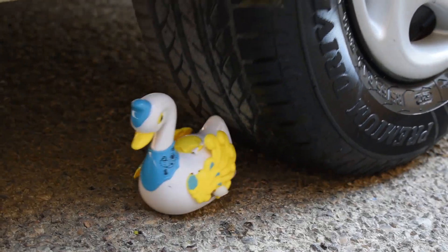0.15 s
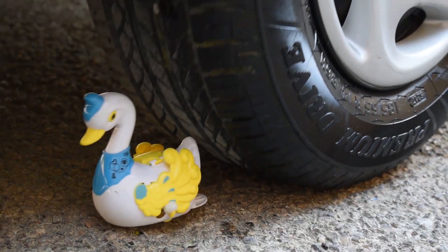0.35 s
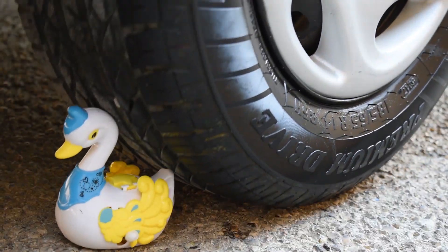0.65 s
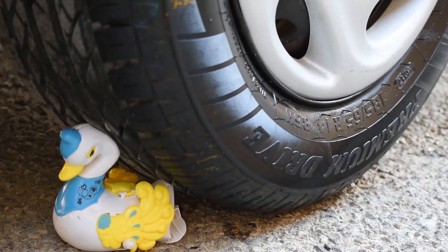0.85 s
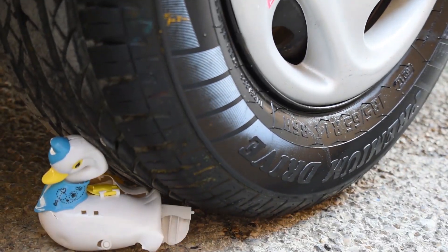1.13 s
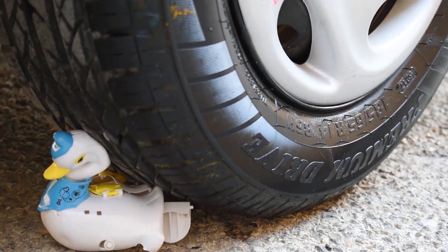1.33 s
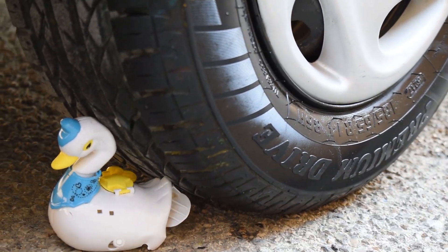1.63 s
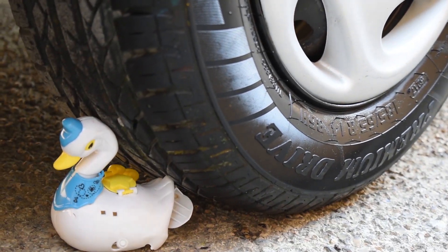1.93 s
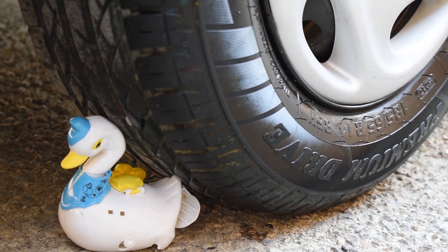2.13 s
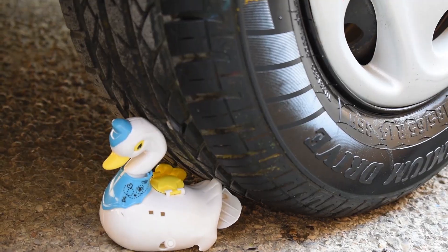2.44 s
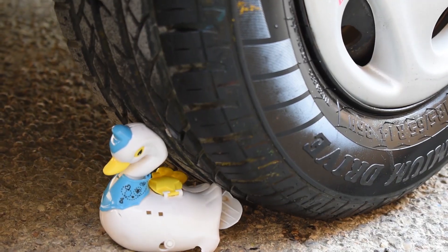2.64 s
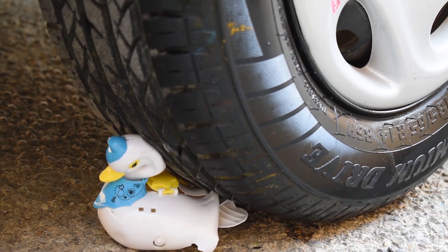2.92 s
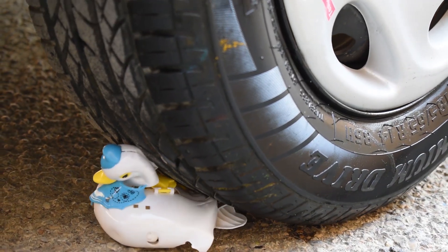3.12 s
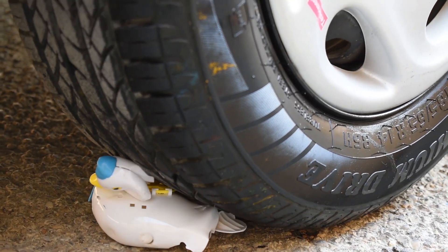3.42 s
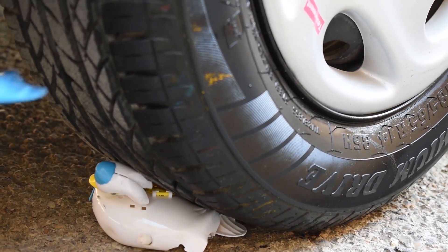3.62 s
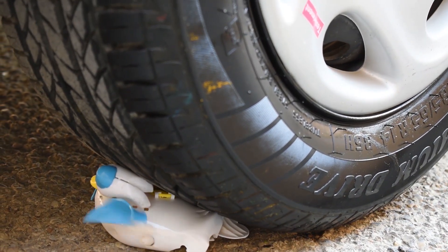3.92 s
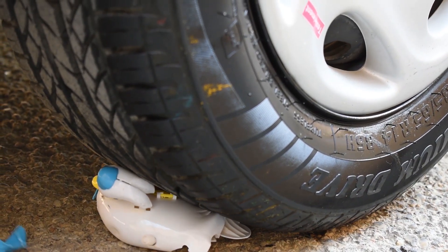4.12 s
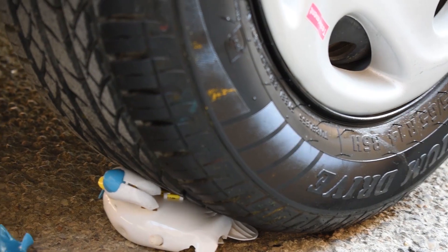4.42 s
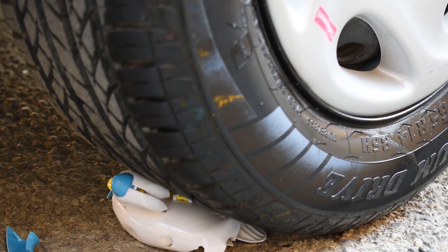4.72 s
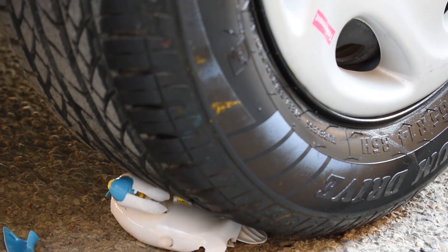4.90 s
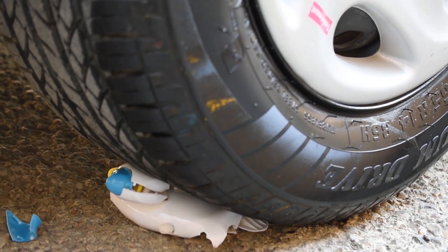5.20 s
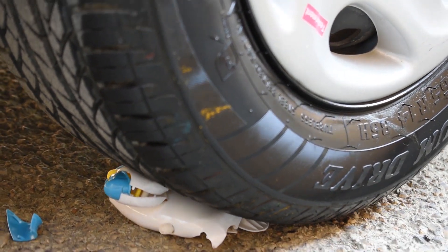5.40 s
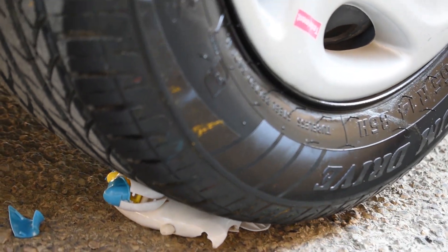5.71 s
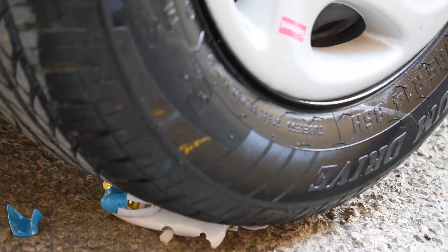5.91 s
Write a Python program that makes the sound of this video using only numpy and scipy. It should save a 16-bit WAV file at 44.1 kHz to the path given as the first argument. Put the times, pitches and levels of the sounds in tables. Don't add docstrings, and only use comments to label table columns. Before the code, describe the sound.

Hollow plastic scuffs and knocks on concrete, then cracks apart in dry, violent snaps under a creeping car tyre, over steady engine roar and whine.

```python
import sys
import numpy as np
from scipy import signal
from scipy.fft import rfft, irfft, next_fast_len
from scipy.io import wavfile
from scipy.ndimage import map_coordinates

SR = 44100
rng = np.random.default_rng(int(sys.argv[2]) if len(sys.argv) > 2 else 0)


def attenuation_scalar(level_db):
    decades = np.asarray(level_db, float) / 20
    return 10 ** decades


def waveform_to_disk(signal):
    frames = np.transpose(np.atleast_2d(signal))
    scaled = np.clip(frames, -1, 1) * 32767
    samples = np.round(scaled).astype(np.int16)
    wavfile.write(sys.argv[1], SR, samples)


N = 266893
TIME_S = np.arange(N) / SR


def unit(x):
    return x / np.sqrt(np.mean(x ** 2) + 1e-20)


def peaked(x):
    return x / np.abs(x).max(axis=-1, keepdims=True)


def along(points, hz):
    f, v = np.transpose(points)
    return np.interp(np.log(hz + 1), np.log(f + 1), v, left=v[0], right=v[-1])


# start_s, end_s
CUTS = [
    (0, 1),
    (1, 2.265),
    (2.265, 7),
]


def curves(tables, cuts=CUTS):
    out = np.full((len(tables[0][0]) - 1, N), -130.)
    for rows, (start, end) in zip(tables, cuts):
        s, *columns = np.transpose(rows)
        on = (TIME_S >= start) & (TIME_S < end)
        out[:, on] = [np.interp(TIME_S[on], s, column) for column in columns]
    return out


def wobble(rate_hz):
    knots = rng.standard_normal(int(N * rate_hz / SR) + 4)
    return map_coordinates(knots, [np.arange(N) * rate_hz / SR])


def filtered(x, response):
    n = x.shape[-1]
    m = next_fast_len(n + 4096)
    return irfft(rfft(x, m) * response(np.fft.rfftfreq(m, 1 / SR)), m)[..., :n]


def causal(spectrum):
    def response(hz):
        cepstrum = irfft(np.log(attenuation_scalar(np.clip(along(spectrum, hz), -70, 0))))
        half = len(cepstrum) // 2
        folded = np.r_[cepstrum[0], 2 * cepstrum[1:half], np.zeros(len(cepstrum) - half)]
        return np.exp(rfft(folded))[:len(hz)]
    return response


# freq_hz, left_right_likeness
ALIKE = [(30, 0.99), (130, 1), (400, 1), (1400, .96), (3100, 0.93), (6800, 0.9), (9000, 0.1), (15000, .5)]


def spread(pair):
    def turn(hz):
        return np.arccos(np.clip(along(ALIKE, hz), -1, 1)) / 2

    mid, side = filtered(pair, lambda hz: np.array([np.cos(turn(hz)), np.sin(turn(hz))]))
    return np.array([mid + side, mid - side])


# multiple_of_firing, level_db from the fourth order
OTHER_ORDERS = [
    (.5, -35),
    (2, -7),
    (5, -2),
    (10, -3.5),
]


def firing_hum(phase, first_db, third_db, fourth_db):
    orders = [(1, first_db), (3, third_db), (4, fourth_db)]
    orders += [(k, fourth_db + db) for k, db in OTHER_ORDERS]
    hum = 0
    for k, db in orders:
        level = attenuation_scalar(db + 2 + 0.79 * wobble(6.9))
        hum = hum + level * np.sin(k * (phase + .04 * wobble(25)))
    return hum


# time_s, level_db
WHINE = [(2.26, -60), (2.7, -65), (3.1, -60), (3.8, -62), (4.25, -56), (4.5, -71), (5, -68), (6.05, -73.5)]
# multiple_of_firing, level_db
PUMP_ORDERS = [
    (9.3, 1),
    (20.4, -3.5),
]


def pump_whine(phase):
    whine_db, = curves([WHINE], CUTS[2:])
    whine = 0
    for k, db in PUMP_ORDERS:
        level = attenuation_scalar(whine_db + db + 3 + 1.5 * wobble(13))
        whine = whine + level * np.sin(k * phase + 0.49 * wobble(25))
    return whine


# freq_hz, level_db per Hz
ROAR = [(24, -43), (40, -18.5), (71, -8.5), (111, -13), (233, 2), (454, -4.5), (643, -3), (956, -2.5),
        (1490, -1), (1610, -2), (5290, -15), (6780, -34.5), (11700, -46), (15000, -60)]
# freq_hz, width_hz, boost_db
BAY = [
    (600, 60, 5),
    (1303, 21, 9),
    (1544, 40, 3),
    (1830, 27, 7.5),
    (5560, 500, 5.5),
]
# freq_hz, level_db per Hz
IDLE = [(26, -40), (45, -3), (87, -9), (219, 2.5), (506, -3.5), (764, -0.5), (1100, -4.5), (1310, 2),
        (1500, -8), (1950, -35), (3300, -120)]


def air_roar(late):
    def bay(hz):
        resonances = sum(db / (1 + (2 * (hz - c) / w) ** 2) for c, w, db in BAY)
        return attenuation_scalar(along(ROAR, hz) + resonances)

    def distance(hz):
        return attenuation_scalar(along(IDLE[:-2] + ROAR[-5:], hz))

    near = unit(filtered((1 + 0.079 * wobble(150)) * rng.standard_normal((2, N)), bay))
    far = unit(filtered(rng.standard_normal((2, N)), distance))
    return np.where(late, near, far)


# freq_hz, level_db per Hz
VALVES = [(1500, -44), (2800, 6.5), (4500, -2.5), (5600, 0.5), (7000, -30), (12000, -49.5), (15000, -71)]


def valve_ticks(phase, late):
    tick = np.exp(-4 * (phase / (2 * np.pi) % 1)) * rng.standard_normal((2, N))
    return attenuation_scalar(np.where(late, -15, -9)) * unit(filtered(tick, causal(VALVES)))


# time_s, level_db
BED = [
    [(.3, -65), (.5, -65), (.8, -66.5)],
    [(1.1, -67), (1.4, -62), (1.7, -62), (2.25, -62)],
    [(2.26, -53.5), (2.9, -53), (3.4, -52.5), (3.9, -53), (4.2, -52.5), (4.6, -53), (5.3, -53), (6.05, -54)],
]
# time_s, firing_hz, first_order_db, third_order_db, fourth_order_db
FIRING = [
    [(.1, 42.4, -80, -82, -86), (.85, 42, -83, -84, -88)],
    [(1.1, 42.1, -81, -66, -90), (1.25, 40.9, -80, -81, -84), (1.6, 36, -77, -86, -86),
     (1.9, 27.94, -75, -88, -86), (2.26, 26, -79, -79, -86)],
    [(2.26, 64.83, -69.5, -66, -67), (2.6, 72.53, -71, -58.5, -73), (3.0, 70.17, -69, -59.5, -69),
     (3.4, 68.02, -68, -65.5, -72), (4.0, 66.87, -73, -77, -63), (4.45, 65.5, -67, -66, -64),
     (4.8, 62.57, -65, -65.5, -69), (5.2, 60.47, -66.5, -62.5, -62), (5.65, 59.76, -76, -60.5, -62),
     (6.05, 59.6, -66, -58.5, -64.5)],
]


def engine():
    roar_db, = curves(BED)
    hz, first_db, third_db, fourth_db = curves(FIRING)
    phase = 2 * np.pi * np.cumsum(hz) / SR
    late = TIME_S > CUTS[2][0]
    tones = firing_hum(phase, first_db, third_db, fourth_db) + pump_whine(phase)
    level = attenuation_scalar(roar_db + 2.5 + 0.56 * wobble(5.1))
    noise = level * (air_roar(late) + valve_ticks(phase, late))
    return spread(noise) + tones * attenuation_scalar([[-.3], [.3]])


# time_s, rasp_db, fizz_db
SCRAPE = [
    [(0.3, -67.5, -86), (0.36, -62.5, -82), (0.466, -66.5, -81.5), (0.558, -59.5, -81), (0.648, -61.5, -78),
     (0.68, -66, -91)],
    [(1.3, -77, -94), (1.45, -70.5, -90), (1.53, -47, -85), (1.6, -70, -87), (1.635, -61, -78),
     (1.65, -54, -63), (1.72, -55, -71), (1.77, -57.5, -73), (1.8, -73, -91), (2.25, -78, -91)],
    [(2.27, -69, -82), (2.32, -64, -85), (2.44, -58, -85), (2.55, -59, -85), (2.97, -55.5, -78),
     (3.17, -58.5, -78), (3.35, -52.5, -61), (3.43, -52, -66), (3.51, -51.5, -68.5), (3.65, -53.5, -69),
     (3.81, -56, -78), (4.31, -59, -80), (4.59, -61.5, -80.5), (4.76, -53, -78), (5.23, -63.5, -83),
     (5.47, -62, -68), (5.67, -57, -77), (5.81, -59, -69), (5.96, -53, -67), (6.05, -64, -78.5)],
]
# freq_hz, level_db per Hz
RASP = [(290, -38), (500, -4.5), (949, -11.5), (1110, -28), (1320, -3.5), (2170, -5.5), (4500, -8),
        (7000, -23), (9100, -50), (15400, -120)]
# freq_hz, level_db per Hz
FIZZ = [(3530, -22), (6000, 19), (6760, -6), (7890, -5), (9400, 2), (10400, -19), (14000, -9),
        (15500, -31.5)]


def scrape():
    rasp_db, fizz_db = curves(SCRAPE)
    ticks = attenuation_scalar(3.7 * wobble(70) + 1.4 * wobble(400)) * rng.standard_normal((2, N))
    rasp = unit(filtered(ticks, causal(RASP)))
    fizz = unit(filtered(ticks, causal(FIZZ)))
    return spread(attenuation_scalar(rasp_db + 1.5) * rasp + attenuation_scalar(fizz_db + 4) * fizz)


# freq_hz, t60_s
UNDERSIDE = [
    (200, 0.094),
    (2000, 0.08),
    (6000, 0.084),
    (12000, 0.032),
]


def underside(x):
    hz, t, z = signal.stft(rng.standard_normal((2, len(x))), SR, nperseg=128)
    tail = signal.istft(z * attenuation_scalar(-60 * t / along(UNDERSIDE, hz)[:, None]), SR, nperseg=128)[1]
    tail = tail[0] + 0.25 * tail[1] * np.array([[1], [-1]])
    delayed = np.pad(x, (150, 0))[None]
    return signal.fftconvolve(delayed, tail / np.linalg.norm(tail[0]), axes=1)[:, :len(x)]


# freq_hz, level_db per Hz
SNAP = [(470, -30), (800, -11), (1330, -2), (2260, 4), (3420, 0.5), (4700, -1), (5060, 9), (6460, -16),
        (7500, -17.5), (9750, -30), (16500, -120)]
# freq_hz, level_db per Hz
SPIT = [(5000, -24), (6500, -0.5), (9000, 3), (11000, -14), (13500, -4), (16000, -39.5)]
# freq_hz, level_db per Hz
THUD = [(60, -25), (130, -6.5), (400, -11.5), (800, -5), (1400, -31.5)]


def add_break(out, s, db, modes, broad, thud_db, spit_db, t60, drag):
    size = 8192
    t = np.arange(SR // 7) / SR
    f = np.fft.rfftfreq(size, 1 / SR)
    tearing = attenuation_scalar(-60 * t / 0.019) + drag * attenuation_scalar(-60 * t / max(t60, .01))
    burst = rng.standard_normal((4, len(t))) * tearing
    burst = burst + 3 * (t < 1 / SR)
    ring = 0
    for k, (hz, width, gain_db) in enumerate(modes):
        resonance = 1j * f * width / (hz * hz - f * f + 1j * f * width)
        ring = ring + (-1) ** k * attenuation_scalar(gain_db) * resonance
    ring = ring / (1 + 1j * f / 6500) ** 2
    shell, floor, air = [causal(spectrum)(f) for spectrum in (SNAP, THUD, SPIT)]
    parts = irfft(rfft(burst, size) * [broad * shell + ring, floor, air, air], size)[:, :len(t)]
    snap, thud, spit, spit_side = peaked(parts) * attenuation_scalar([[0], [thud_db], [spit_db], [spit_db]])
    direct = snap + thud + .8 * spit + .5 * spit_side * np.array([[1], [-1]])
    echo = attenuation_scalar(-12) * underside(direct.mean(axis=0))
    out[:, round((s + .0004) * SR):][:, :len(t)] += attenuation_scalar(db) * (direct + echo)


# start_s, peak_db, ring_hz, thud_db, spit_db, t60_s
SKIDS = [(0.2294, -46, 1630, -18, -31, 0.07), (0.36, -42, 3330, -26, -38, 0.057),
         (0.6795, -40, 1790, -17, -23, 0.07), (0.6904, -40, 3440, -33, -18, 0.081),
         (0.7026, -40, 3330, -36, -19, 0.077), (0.72, -28.5, 3570, -24, -20.5, 0.067),
         (0.7477, -47, 4480, -26, -33, 0.059), (0.7567, -40.5, 4440, -23, -32, 0.061),
         (0.7697, -39.5, 4480, -53, -23, 0.045), (0.7772, -46, 2610, -31, -16, 0.07),
         (0.7907, -37.5, 1270, -40, -29, 0.049), (1.2685, -42, 2750, -16, -21, 0.098),
         (1.276, -34.5, 2750, -26, -32, 0.095), (1.3703, -34.5, 1720, -22, -36, 0.13),
         (1.4089, -31, 1900, -20, -30, 0.049), (1.4526, -51, 1570, -14, -21, 0.059),
         (1.48, -30, 2400, -36, -33, 0.035), (1.5105, -29, 3640, -24, -20, 0.1),
         (1.5258, -26.5, 3800, -31, -18, 0.043), (1.5482, -33, 2580, -15.5, -20, 0.058),
         (1.6824, -29, 3100, -31, -28, 0.055), (1.7069, -30, 1780, -15, -34, 0.07),
         (1.713, -26, 1800, -17.5, -28, 0.065), (1.725, -30, 1310, -34, -32, 0.051)]


def skids(out):
    for s, db, hz, thud_db, spit_db, t60 in SKIDS:
        add_break(out, s, db, [(hz, 400, 4)], .9, thud_db + 3.5, spit_db + 8, t60, drag=1.0)


# start_s, peak_db, ring_hz, thud_db, spit_db, t60_s
CRACKS = [(2.9061, -22, 1281, -12, -19, 0.13), (2.9892, -24.5, 3070, -35, -14.5, 0.035),
          (3.1377, -30, 1380, -29, -18, 0.045), (3.1916, -33, 1300, -26, -25, 0.045),
          (3.2064, -26, 1735, -16.5, -16.5, 0.057), (3.2437, -31, 1840, -20, -35, 0.039),
          (3.2801, -25, 1110, -37, -3.5, 0.057), (3.3438, -25, 3900, -18, -11, 0.042),
          (3.3708, -21, 5160, -47, -12, 0.083), (3.4101, -23, 1820, -33, -14, 0.056),
          (3.4242, -26, 2900, -30, -16, 0.046), (3.4675, -33, 1550, -20, -11, 0.049),
          (3.5407, -20, 2790, -22.5, -16, 0.041), (3.5661, -29.5, 4950, -14, -5.5, 0.089),
          (3.5979, -18, 2750, -13, -10.5, 0.039), (3.6935, -19, 1237, -17.5, -10.5, 0.048),
          (3.9704, -31, 5210, -31.5, -10.5, 0.068), (4.0068, -36.5, 1540, -23, -5, 0.046),
          (4.7653, -28, 4490, -15, -12, 0.056), (5.0572, -31.5, 2350, -27.5, -38, 0.035),
          (5.1208, -29.5, 2560, -18.5, -35, 0.074), (5.202, -35.5, 2510, -10.5, -7.5, 0.032),
          (5.2587, -38, 1837, -15.5, -34, 0.05), (5.3085, -33, 1830, -26.5, -16, 0.08),
          (5.369, -41.5, 1820, -19, -3, 0.045), (5.6215, -36.5, 1320, -24, -4.5, 0.053),
          (5.7305, -21.5, 4930, -5.5, -3.5, 0.018), (6.0424, -28.5, 4660, -42, -18, 0.047)]
# start_s, peak_db, ring_hz, thud_db, spit_db, t60_s
LEAD_INS = [
    (4.84, -38, 1280, -14, -24, 0.049),
    (4.862, -19, 2460, -15, -17, .04),
    (5.8248, -35, 3000, -20, -5, .02),
    (5.92, -33, 2900, -20, -12, .03),
]


def small_cracks(out):
    for s, db, hz, thud_db, spit_db, t60 in CRACKS + LEAD_INS:
        add_break(out, s, db, [(hz, 400, 8)], .8, thud_db, spit_db, t60, drag=0.28)


# start_s, peak_db, thud_db, spit_db, t60_s
BREAKS = [
    (3.0706, -9, -35.5, -15, 0.025),
    (3.4924, -14.5, -19, -12.5, 0.071),
    (3.8531, -14, -23, -13, 0.052),
    (4.8733, -7.5, -28.5, -12.5, 0.079),
    (5.8272, -6.5, -17, -23, 0.028),
    (5.8825, -13, -15.5, -20, 0.036),
    (5.9281, -9.5, -11.5, -12.5, 0.048),
]
# freq_hz, width_hz, level_db
PIECES = [
    [(1780, 190, 3), (2260, 240, 3.5), (2860, 450, -5.5), (5380, 270, -1.5)],
    [(1530, 150, -15.5), (3180, 150, 2.5), (3910, 270, -1.5), (5440, 230, -3)],
    [(560, 160, -7), (1240, 120, -2), (2040, 130, -9), (3100, 120, 3)],
    [(610, 200, 1.5), (934, 100, 3), (1900, 330, 0.5), (4950, 740, 4.5)],
    [(563, 220, -1.5), (2170, 620, 5.5), (3280, 280, -6.5), (4950, 282, -13)],
    [(817, 420, 2), (1697, 390, 7.5), (2470, 440, 4), (4480, 206, -15)],
    [(1210, 460, -6.5), (2580, 320, 5.5), (3130, 500, -5), (4440, 250, -1)],
]


def big_breaks(out):
    for (s, db, thud_db, spit_db, t60), modes in zip(BREAKS, PIECES):
        add_break(out, s, db, modes, .45, thud_db, spit_db, t60, drag=0.36)


# start_s, peak_db
CHIPS = [(4.042, -55), (4.125, -61), (4.484, -55), (4.552, -51.5), (4.64, -54), (4.744, -55.5),
         (4.977, -51), (5.499, -46), (5.599, -48), (5.696, -49), (5.771, -49.5)]


def chips(out):
    for s, db in CHIPS:
        add_break(out, s, db, [(4800, 950, 0)], .1, -30, 3, .025, drag=0.19)


def toy_breaking():
    out = np.zeros((2, N + SR))
    for play in (skids, small_cracks, big_breaks, chips):
        play(out)
    return out[:, :N]


# time_s, gain
FADES = [(.125, 0), (.15, .14), (.21, .4), (.33, 1), (.775, 1), (.8, .35), (.82, 0), (1.098, 0),
         (1.11, .15), (1.17, .4), (1.35, 1)]


def scene():
    fader = np.interp(TIME_S, *np.transpose(FADES))
    return fader * (engine() + scrape() + toy_breaking())


def low_pass(x):
    return signal.sosfilt(signal.butter(12, 16650, fs=SR, output="sos"), x)


def record(dry):
    soft = filtered(dry, lambda hz: 1 / (1 + (hz / 15300) ** 24))
    return low_pass(soft)


dry = scene()
out = record(dry)
waveform_to_disk(out)
```